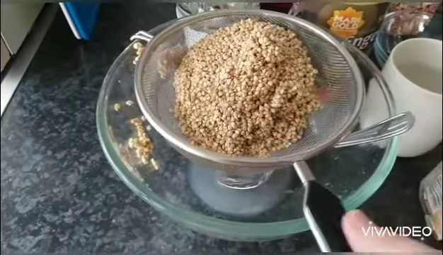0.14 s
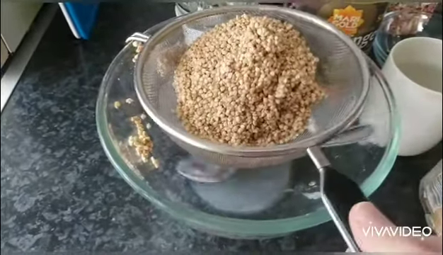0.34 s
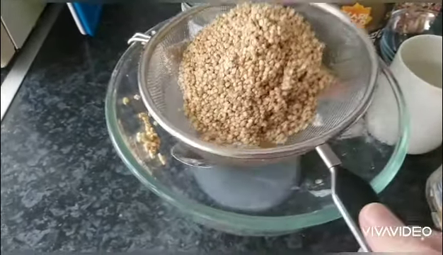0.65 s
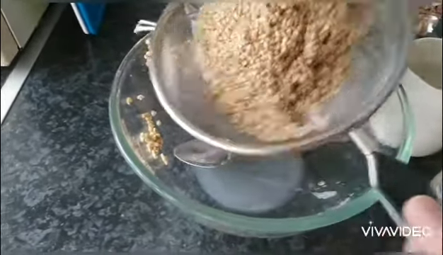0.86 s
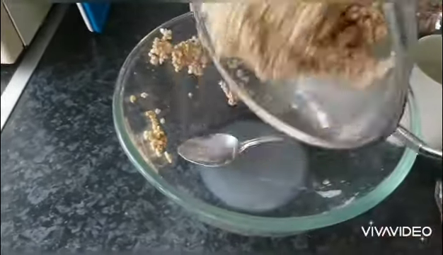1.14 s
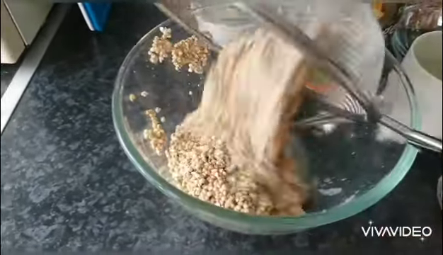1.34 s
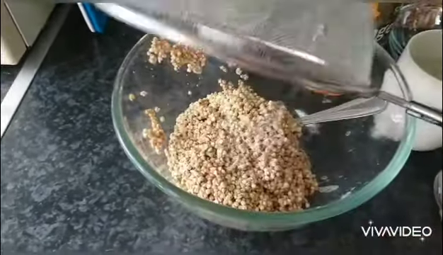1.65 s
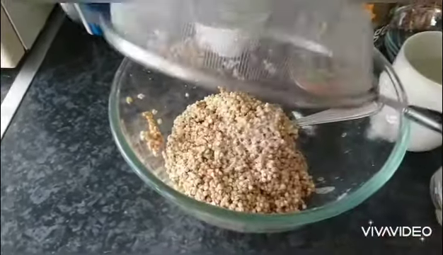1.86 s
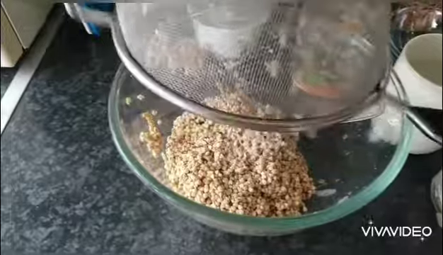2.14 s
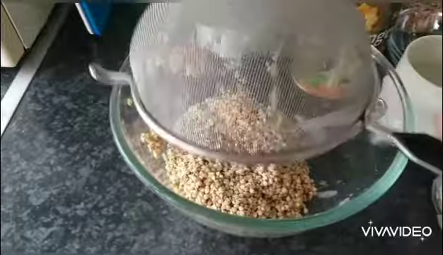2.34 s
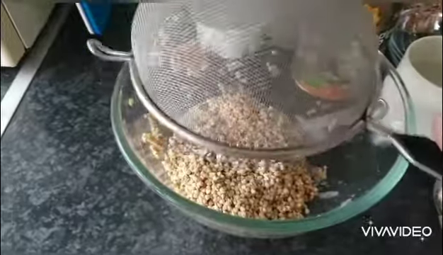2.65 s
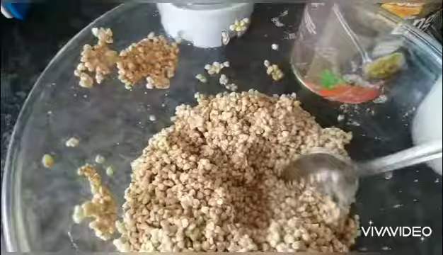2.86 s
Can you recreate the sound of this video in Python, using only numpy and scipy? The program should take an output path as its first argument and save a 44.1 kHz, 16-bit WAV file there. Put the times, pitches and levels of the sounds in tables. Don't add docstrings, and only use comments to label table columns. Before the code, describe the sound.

Metal mesh sieve scrapes and knocks a glass bowl, wet grain drops in, then ringing taps

```python
import sys
import numpy as np
from scipy import signal
from scipy.fft import rfft, irfft, next_fast_len
from scipy.io import wavfile
from scipy.ndimage import uniform_filter1d, map_coordinates

SR = 44100
rng = np.random.default_rng(int(sys.argv[2]) if len(sys.argv) > 2 else 0)


def ratio_of_db(decibels):
    return 10 ** (np.asarray(decibels, float) / 20)


def int16_out(signal):
    q = np.round(np.clip(np.atleast_2d(signal).T, -1, 1) * 32767)
    wavfile.write(sys.argv[1], SR, q.astype(np.int16))


N = 132300


def unit(x):
    return x / np.sqrt(np.mean(x ** 2) + 1e-20)


def along(points, hz):
    f, v = np.transpose(points)
    return np.interp(np.log(hz + 1), np.log(f + 1), v)


def level(rows):
    s, db = np.transpose(rows)
    return ratio_of_db(np.interp(np.arange(N) / SR, s, db, left=-150, right=-150))


def filtered(x, response):
    m = next_fast_len(N + SR // 2)
    return irfft(rfft(x, m) * response(np.fft.rfftfreq(m, 1 / SR)), m)[..., :N]


def burst(spectrum):
    cepstrum = irfft(np.log(ratio_of_db(along(spectrum, np.fft.rfftfreq(2048, 1 / SR)))))
    cepstrum[1:1024] *= 2
    cepstrum[1025:] = 0
    h = irfft(np.exp(rfft(cepstrum)))
    return h / np.linalg.norm(h)


def through(x, h):
    return signal.fftconvolve(x, h)[:N]


def spikes(rate, scatter_db):
    happens, sign, size = rng.random((3, N))
    return unit((happens < rate / SR) * np.sign(sign - .5) * ratio_of_db(-scatter_db * np.log(size + 0.0014)))


def contact(s, hold, t60):
    t = np.arange(N) / SR - s
    return (t >= 0) * ratio_of_db(-60 * np.clip(t - hold, 0, 1) / t60)


def shiver(x, db):
    mesh_t60 = 0.36
    tail = ratio_of_db(-60 * np.arange(SR // 2) / SR / mesh_t60) * rng.standard_normal(SR // 2)
    return ratio_of_db(db) * through(x, tail / np.linalg.norm(tail))


def ringing(pushes, modes, scatter_db, split, tilt_db=0, angle=0.38, couple_db=None):
    out = np.zeros(N)
    for n, (hz, db, t60) in enumerate(modes):
        for side, share in ((-.5, 0.63), (.5, 0.36)):
            r = ratio_of_db(-60 / (t60 * SR))
            w = 2 * np.pi * hz * (1 + side * split) / SR
            wander = np.repeat(rng.standard_normal(N // 400 + 1), 400)[:N]
            place_db = scatter_db * wander + tilt_db * np.log2(hz / 3300)
            place_db += 5 * np.cos((n + 2) * angle + side / 2)
            if couple_db is not None:
                place_db += couple_db[n]
            push = pushes * share * ratio_of_db(db + place_db)
            out += signal.lfilter([0, np.sin(w)], [1, -2 * r * np.cos(w), r * r], push)
    return out


def hiss(spectrum):
    # pitch_hz, correlation (-1 to 1)
    alike = [(60, 0.66), (350, 0.47), (2060, -0.1), (12000, 0.07)]

    def shares(hz):
        turn = np.arccos(np.clip(along(alike, hz), -1, 1)) / 2
        return ratio_of_db(along(spectrum, hz)) * [np.cos(turn), np.sin(turn)]

    mid, side = filtered(rng.standard_normal((2, N)), shares)
    return unit(np.array([mid + side, mid - side]))


def air():
    # pitch_hz, level_db per Hz
    air_colour = [(15, -39), (25, -28.5), (92, -4), (176, -15.5), (216, -7), (273, -12.5), (510, -17),
                  (5160, -24.5), (12500, -37), (16200, -39.5), (22000, -120)]
    return ratio_of_db(-62) * hiss(air_colour)


def clanks():
    # start_s, pitch_hz, peak_db, t60_s
    clank_rows = [(.0674, 2315, -22.5, 0.022), (0.142, 2062, -44.5, 0.051), (0.214, 3520, -31, .08),
                  (.245, 3320, -20.5, .08), (.496, 352, -42.5, .1), (.496, 684, -34.5, .05),
                  (.08, 450, -53.5, .15), (0.498, 1285, -35.5, 0.041), (1.282, 7000, -29, 0.057),
                  (1.30, 6380, -32, 0.07), (1.7259, 6960, -27, 0.029), (1.984, 7230, -17.5, 0.05),
                  (0.263, 3134, -32.5, .06), (0.297, 1773, -35, .03), (.30, 3767, -29.5, 0.12),
                  (.366, 3660, -36.5, .08), (.40, 1240, -46.5, 0.44), (.435, 3670, -38, .05),
                  (1.2556, 6550, -43, .03), (1.268, 9490, -41.5, 0.12), (1.294, 3720, -27, 0.068),
                  (1.304, 3180, -36, 0.088), (1.346, 3350, -38, .03), (1.396, 2370, -36.5, 0.035),
                  (1.485, 6400, -57, 0.016), (1.616, 4250, -55.5, .03), (1.792, 3356, -12.5, 0.037),
                  (1.792, 1320, -23.5, 0.017), (1.795, 4745, -19, 0.039), (1.895, 6300, -47, .03),
                  (1.984, 1610, -26, 0.016), (2.218, 3250, -47, 0.024), (2.248, 3650, -22.5, .03),
                  (2.557, 6800, -31.5, 0.023), (2.686, 3323, -44, .1), (2.775, 1171, -40.5, 0.11)]
    out, t = np.zeros(N + SR), np.arange(SR // 2) / SR
    for s, hz, db, t60 in clank_rows:
        pair = np.sin(2 * np.pi * hz * t) + 0.3 * np.sin(2 * np.pi * hz * 0.91 * t)
        onset = 1 - np.exp(-t / .0007)
        out[round(s * SR):][:len(t)] += ratio_of_db(db - 60 * t / t60) * pair * onset
    return out[:N]


def ticks(chatter):
    # start_s, wire_db, knock_db
    tick_rows = [(0.0673, -39.5, -29.5), (0.0735, -60, -44), (1.0658, -42.5, -51), (1.2563, -41, -38),
                 (.2975, -28.5, -38.5), (1.4428, -47, -41), (1.458, -65, -49), (1.497, -60, -65),
                 (1.542, -56.5, -53), (1.615, -63.5, -59.5), (1.6488, -62, -60), (1.7263, -35.5, -73),
                 (1.78, -51, -72.5), (2.22, -60, -44.5), (2.24, -28, -42), (2.4256, -44, -75),
                 (2.458, -50.5, -75), (2.6476, -45.5, -61.5), (2.693, -15.5, -28), (2.7270, -31.5, -30.5)]
    wire, knock = np.zeros((2, N))
    for s, wire_db, knock_db in tick_rows:
        tick = chatter * contact(s, 0.00042, 0.032)
        wire += ratio_of_db(wire_db) * tick
        knock += ratio_of_db(knock_db) * tick
    return wire, knock


def drag():
    # time_s, pressure_db
    pressure_rows = [
        (.08, -53.5),
        (.125, -41.5),
        (.19, -36.5),
        (.24, -25),
        (.29, -24.5),
        (.33, -22),
        (.38, -52),
        (.43, -65),
        (.49, -66),
    ]
    # start_s, level_db
    catches = [
        (0.1356, -19.5),
        (0.196, -19.5),
        (0.247, -9.5),
        (0.2693, 2.5),
        (0.2977, 9.5),
        (0.3154, -11),
        (0.345, -8.5),
        (0.3638, -9),
        (0.3984, -22),
    ]
    catching = sum(ratio_of_db(db - 11.5) * contact(s, 0, 0.07) for s, db in catches)
    pressure = level(pressure_rows) + uniform_filter1d(catching, size=220)
    return pressure * spikes(3800, 1.5)


def loaded_glass(slips):
    loaded_hz = [480, 1240, 1850, 2120, 3290, 3420, 4712, 5640, 6335, 7100, 7630, 8970, 10220]
    # level_db, t60_s
    loaded = [(-9, 0.43), (-23, 0.3), (-10.5, 0.044), (10.5, 0.21), (17, 0.22), (-4.5, 0.055),
              (16.5, 0.099), (2.5, 0.087), (13.5, .09), (-6.5, 0.05), (0, 0.07), (-12, 0.12),
              (-17.5, 0.055)]
    turning = 6 * np.arange(N) / SR
    return ringing(ratio_of_db(-50.5) * slips, np.c_[loaded_hz, loaded], 3.34, .006, angle=turning)


def thud():
    # start_s, level_db
    landings = [
        (.085, -56.5),
        (0.132, -68),
        (0.326, -60),
        (0.512, -57.5),
        (.58, -61),
        (1.269, -47),
        (1.291, -38.5),
        (1.43, -54),
        (1.53, -61),
    ]
    # pitch_hz, level_db, t60_s
    counter = [(69.5, -2, 0.37), (86, 4.5, 0.28), (154.3, -1, 0.34), (202.6, -6.5, 0.54)]
    push = np.zeros(N)
    for s, db in landings:
        push[round(s * SR)] = ratio_of_db(db)
    return ringing(through(push, np.hanning(130) / 50), counter, 0.0092, 0.012)


def blows(chatter):
    # start_s, wire_db, knock_db, glass_ring_db, brightness_db per octave
    blow_rows = [
        (0.4935, -28, -28, -54.5, -3),
        (1.2682, -35.5, -40, -61, 6),
        (1.7923, -28, -27.5, -55, -6),
        (1.9835, -23.5, -25, -50.5, 6),
        (2.248, -20, -19, -48, 2),
        (2.4768, -20, -21, -54, 2),
        (2.6840, -23.5, -17, -45.5, 1),
    ]
    strike_angle = [1.313, 0.32, 1.616, 0.028, 3.02, 0.042, 1.42]
    coupling = [(-5.5, -2, 7.5, 16.5, 9.5), (2, -7, 1.5, 4.5, -1), (-24, -4, -3, 9, 14.5),
                (3.5, 3, 2.5, 1, -20.5), (3.5, 0.5, 2, -3, 8), (5.5, -6, -4, 0.5, 3.5),
                (5.5, -2.5, 3, -1.5, 8)]
    strong = [0, 1, 2, 3, 5]
    glass_hz = [1161, 2095, 3293, 4712, 5660, 6335, 6800, 7080, 7260, 7630, 8250, 8970, 9500, 10220]
    # level_db, t60_s
    glass_modes = [(-2.5, 0.22), (1, 0.21), (-1, 0.28), (-0.5, 0.26), (-33, 0.067), (10.5, 0.087),
                   (-19, 0.075), (-25, 0.1), (-15.5, 0.073), (-16.5, 0.067), (-25.5, .2), (-15.5, 0.17),
                   (-14.5, 0.0634), (-20, 0.059)]
    # pitch_hz, level_db, t60_s
    rocking = [(372.4, -3, 0.2), (483, 2, 0.12), (680, -3, 0.081), (775, 4, 0.078), (843, 8, 0.17)]
    hold_s, t60 = 0.0057, .035
    wire, knock, ring, tilt_db, place = np.zeros((5, N))
    couple_db = np.zeros((len(glass_modes), N))
    for row, angle, couple in zip(blow_rows, strike_angle, coupling):
        s, wire_db, knock_db, ring_db, bright_db = row
        at = round(s * SR)
        wire += ratio_of_db(wire_db) * chatter * contact(s, hold_s, t60)
        knock += ratio_of_db(knock_db) * chatter * contact(s, hold_s * 0.42, t60)
        ring[at] = ratio_of_db(ring_db + 20)
        tilt_db[at:], place[at:] = bright_db, angle
        couple_db[strong, at:] = np.c_[list(couple)]
    body = ringing(ratio_of_db(-47.5) * knock, rocking, 0, 0.043, angle=3 * place)
    driven = ring + shiver(ring, -13)
    glass = ringing(driven, np.c_[glass_hz, glass_modes], 0, 0.00501, tilt_db, place, couple_db)
    return wire, knock, body, glass


def sieve():
    # pitch_hz, level_db
    wire_colour = [(100, -56), (2500, -1), (4500, 6), (5800, 12.5), (7000, 18), (7800, 2), (10000, -6),
                   (12000, -24)]
    # pitch_hz, level_db
    knock_colour = [(40, -64), (150, -39), (350, -14), (900, 16), (2000, 28), (3500, 32.5), (5000, 19),
                    (10000, -63)]
    # pitch_hz, level_db
    mesh_colour = [(300, -19), (4500, -18.5), (6000, -24), (7000, 10), (7700, -3.5), (9500, -30.5),
                   (12000, -50)]
    chatter = spikes(3400, 1.5)
    tick_wire, tick_knock = ticks(chatter)
    slips = drag()
    wire, knock, body, glass = blows(chatter)
    wire += ratio_of_db(-14.5) * slips
    knock += ratio_of_db(-18.5) * slips

    full = np.arange(N) / SR < 1.1
    free = np.where(full, ratio_of_db(-15.5), 1)
    mesh = shiver(free * wire, -11)
    rattle = shiver(free * knock, -23)
    wire += tick_wire
    knock += rattle + tick_knock

    glass += loaded_glass(slips)
    glass *= np.where(full, contact(0, 0.5, 0.1), 1)
    metal = through(wire, burst(wire_colour)) + through(mesh, burst(mesh_colour))
    return metal + through(knock, burst(knock_colour)) + body, glass


def plinks():
    u, t = rng.random((1500, 4)), np.arange(400) / SR
    hz = np.clip(4110 * np.exp(1.59 * (u[:, 1:2] - .5)), 300, 11000)
    decay = ratio_of_db(-60 * t * hz / (3 * 10.4))
    tone = ratio_of_db(-5 * np.log(u[:, 2:3] + 0.0092)) * np.sin(2 * np.pi * hz * t) * decay
    at = (u[:, :1] * N).astype(int) + np.arange(400)
    return unit(np.bincount(at.ravel(), tone.ravel(), N + SR)[:N])


def grain():
    # time_s, flow_db
    pour = [
        (1.08, -69),
        (1.16, -53),
        (1.2, -48.5),
        (1.25, -48),
        (1.275, -29.5),
        (1.32, -37),
        (1.42, -50.5),
        (1.49, -56),
        (1.53, -74),
    ]
    # pitch_hz, level_db per Hz
    grain_colour = [(150, -28), (400, -2), (1500, 2.5), (3700, 9.5), (5600, -1), (7000, -3), (8000, -26),
                    (12000, -32.5)]
    flow = 0.5 * rng.standard_normal(N) + 0.5 * spikes(1400, 3)
    clumps = ratio_of_db(3 * map_coordinates(rng.standard_normal(N // 300 + 4), [np.arange(N) / 300]))
    slide = unit(through(flow * clumps, burst(grain_colour)))
    return level(pour) * (slide + ratio_of_db(-6.5) * plinks())


def next_scene():
    # pitch_hz, level_db per Hz
    noise_colour = [(24, -22), (40, -22), (94, 1), (156, -16.5), (405, -15.5), (3010, -22.5), (12000, -42),
                    (15600, -81), (22000, -120)]
    return ratio_of_db(-50.5) * hiss(noise_colour)


def kitchen(x):
    # pitch_hz, t60_s
    decay = [(200, 0.91), (1500, 0.33), (6000, 0.38), (11000, 0.29)]
    # pitch_hz, share (0 to 1)
    common = [(100, 0.91), (500, 1), (2000, 0.06)]
    out, step = np.zeros((2, N + SR)), SR // 5
    for i in range(0, N, step):
        hz, t, z = signal.stft(rng.standard_normal((2, SR // 2)), SR, nperseg=256)
        tail = signal.istft(z * ratio_of_db(-60 * t / along(decay, hz)[:, None]), SR, nperseg=256)[1]
        wet = signal.fftconvolve(x[None, i:i + step], tail / np.linalg.norm(tail[0]), axes=1)
        out[:, i + 130:][:, :wet.shape[1]] += wet

    def shares(hz):
        alike = along(common, hz)
        return np.sqrt([1 + alike, np.abs(1 - alike)]) / 2 ** .5

    mid, side = filtered(out[:, :N], shares)
    return np.array([mid + side, mid - side])


def ports(x, lag_s, pan_db=0):
    # pitch_hz, level_db
    left_over_right = [(60, 2.5), (130, 3.5), (270, 1.5), (580, 6), (1240, 5), (2650, 6), (5650, 10.5),
                       (12000, 31.5)]
    half = np.array([[.5], [-.5]])

    def response(hz):
        colour = ratio_of_db(half * (along(left_over_right, hz) + pan_db))
        return colour * np.exp(-2j * np.pi * hz * half * lag_s)

    return filtered(x, response)


def scene():
    clank = clanks()
    metal, glass = sieve()
    near = metal + grain()
    room = kitchen(near + ratio_of_db(-1) * clank + ratio_of_db(-3) * glass)
    heard = near + ratio_of_db(-10) * room + thud()
    both = ports(heard, -0.00015) + ports(glass, -0.000069, -2) + ports(clank, -.0002, 4)
    changed = np.arange(N) / SR > 2.93
    return np.where(changed, next_scene(), both) + air()


def band_limit(x):
    return signal.sosfilt(signal.butter(12, 12650, fs=SR, output="sos"), x)


def record(dry):
    # pitch_hz, level_db
    mic = [(20, -25.5), (60, -5.5), (10800, -0.5), (12500, -25)]
    clipped = dry / (1 + np.abs(dry / .52) ** 4) ** .25
    return band_limit(filtered(clipped, lambda hz: ratio_of_db(along(mic, hz)) * (hz < 12600)))


dry = scene()
out = record(dry)
int16_out(out)
```